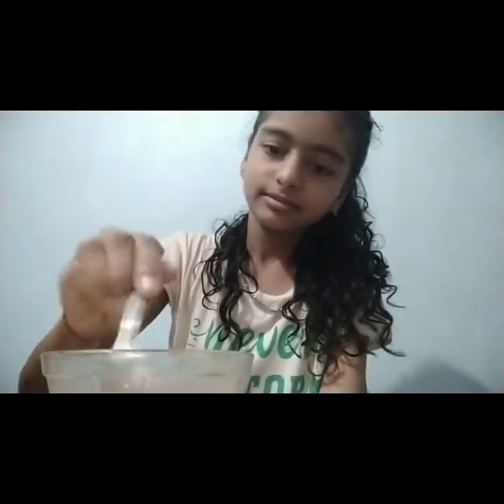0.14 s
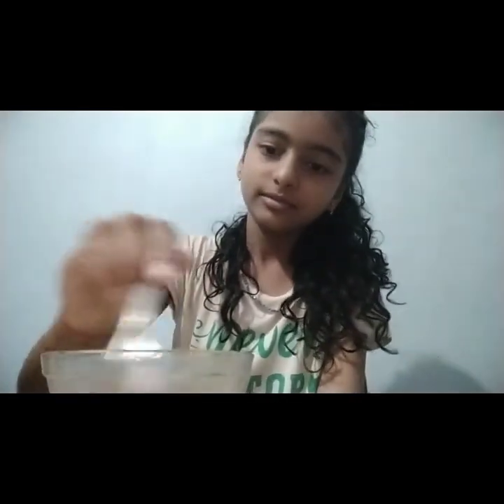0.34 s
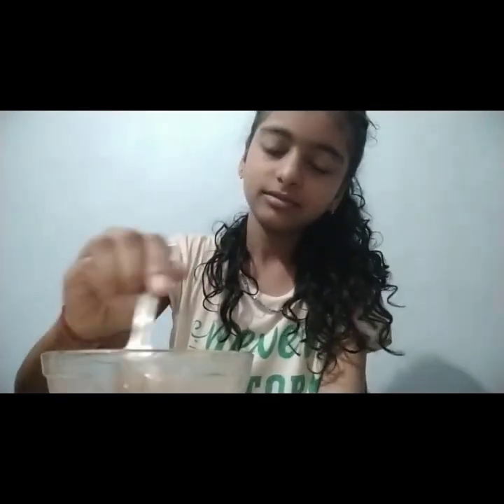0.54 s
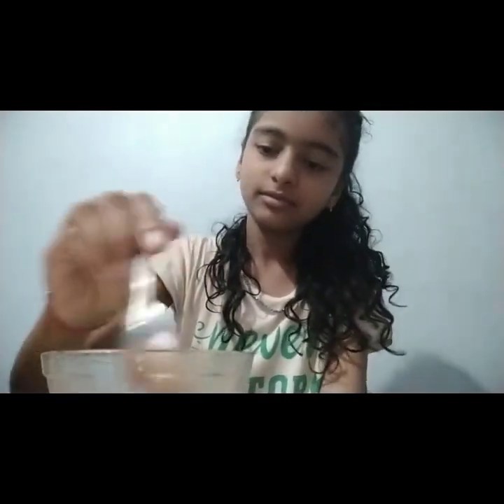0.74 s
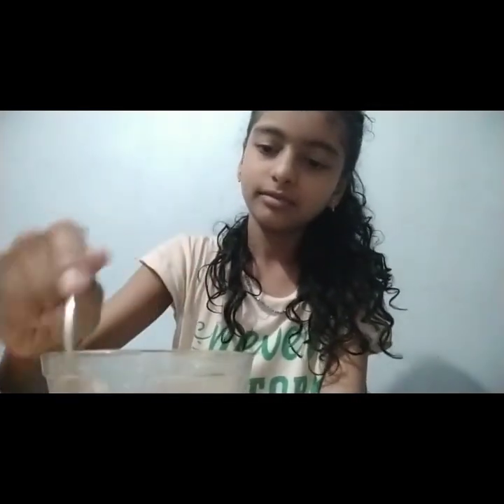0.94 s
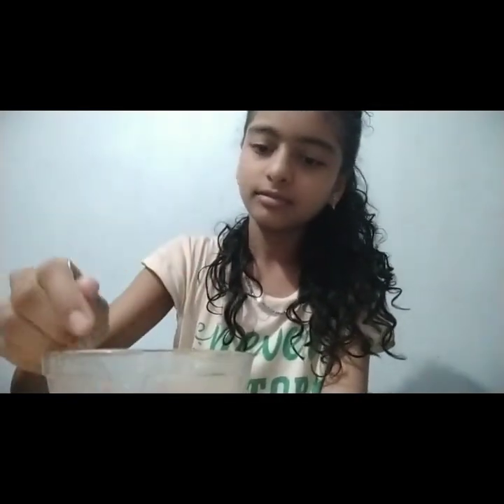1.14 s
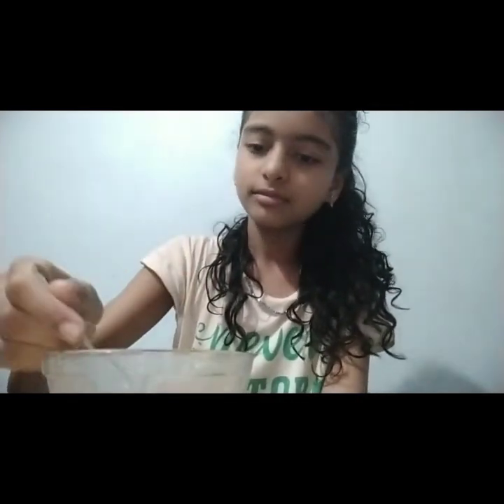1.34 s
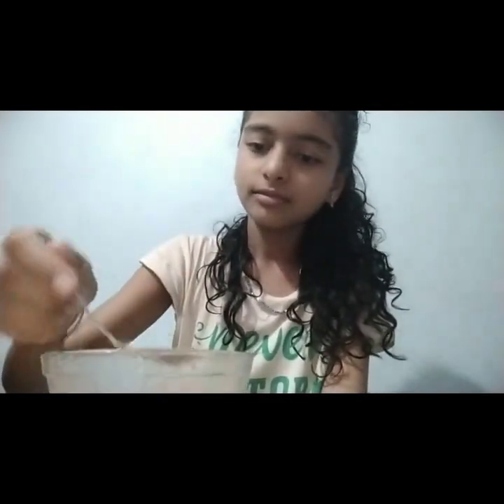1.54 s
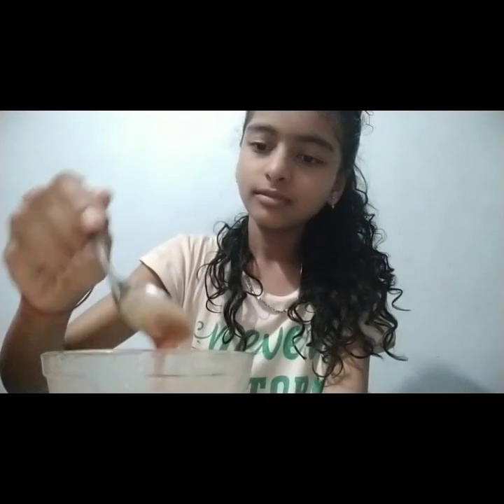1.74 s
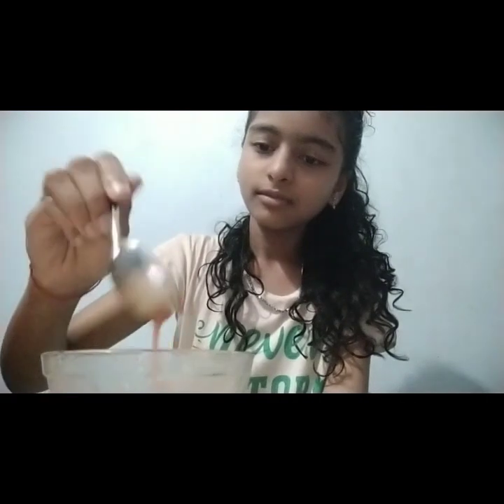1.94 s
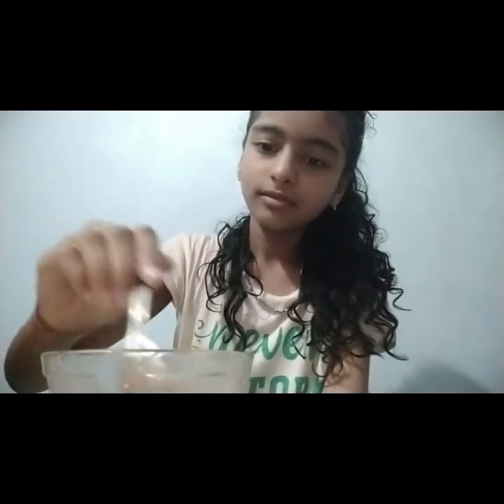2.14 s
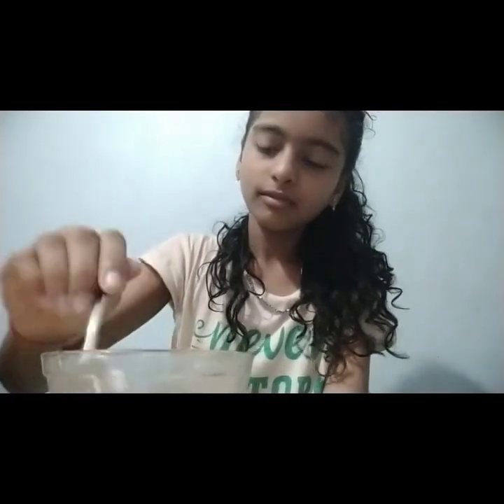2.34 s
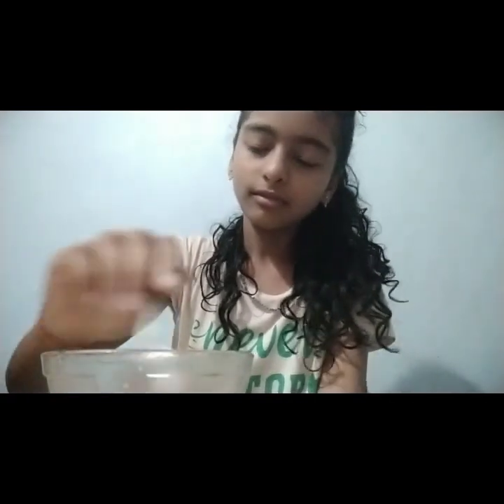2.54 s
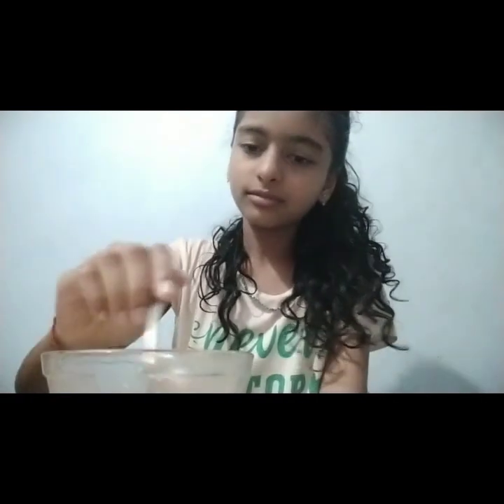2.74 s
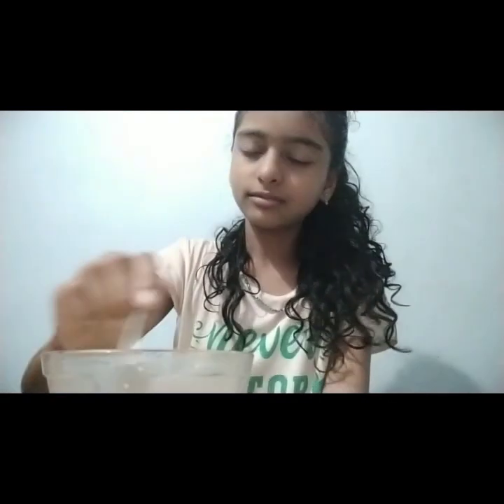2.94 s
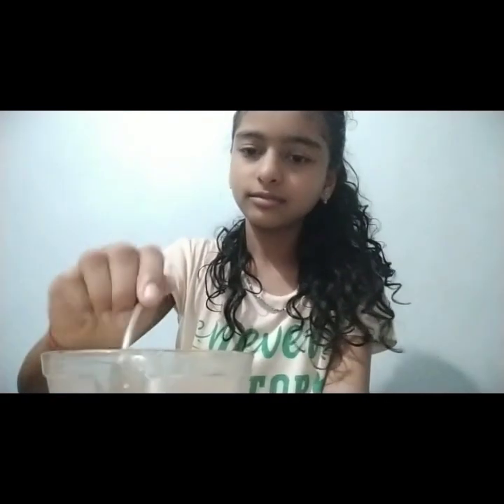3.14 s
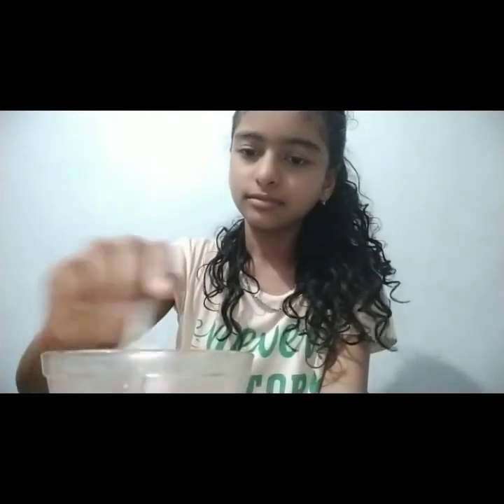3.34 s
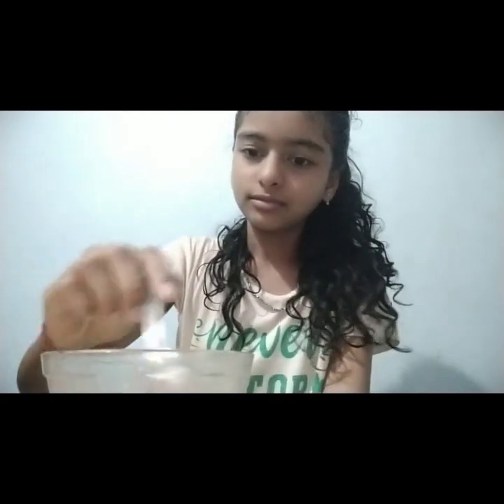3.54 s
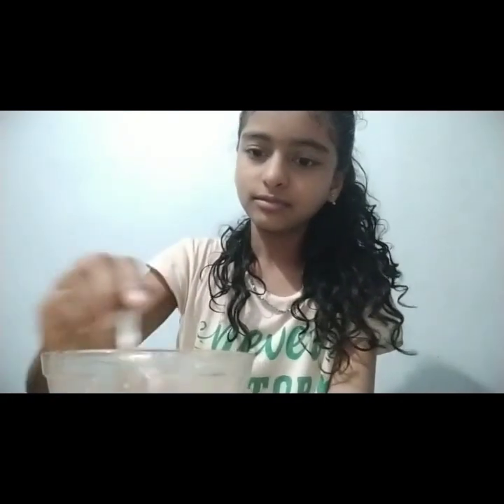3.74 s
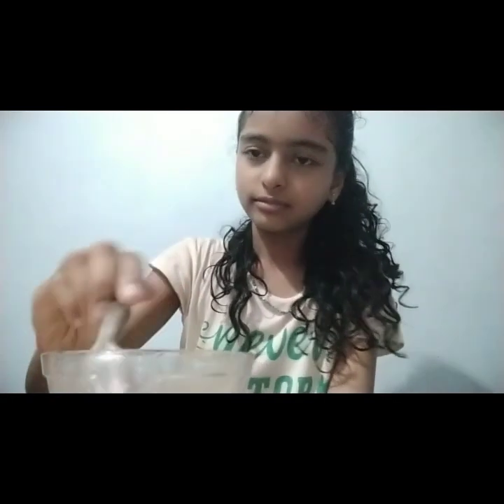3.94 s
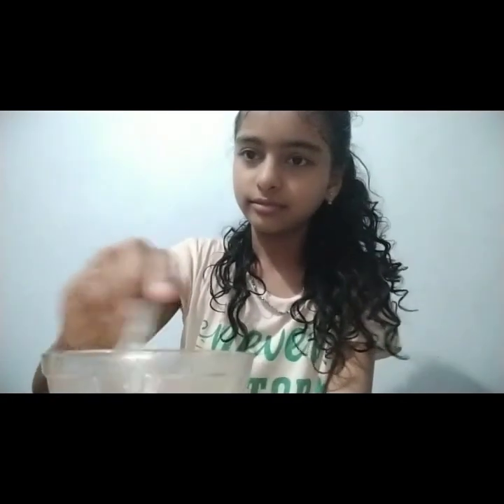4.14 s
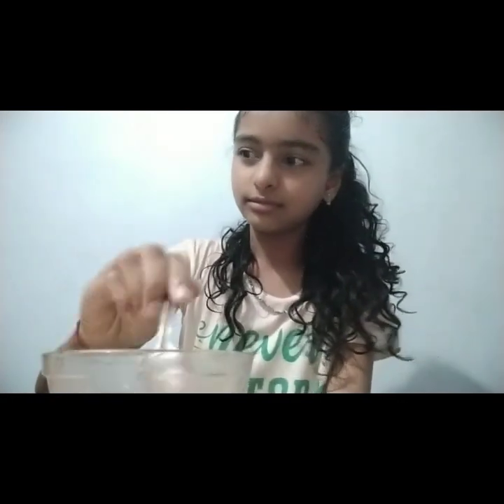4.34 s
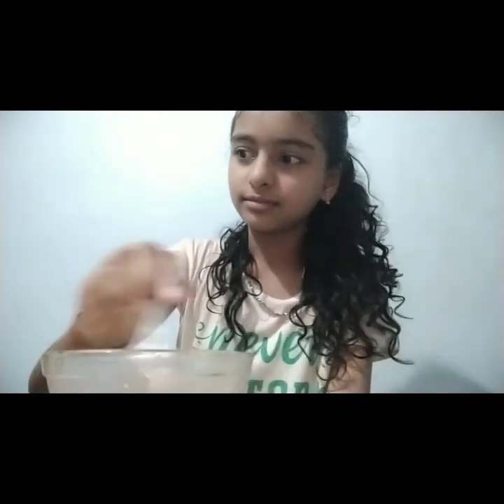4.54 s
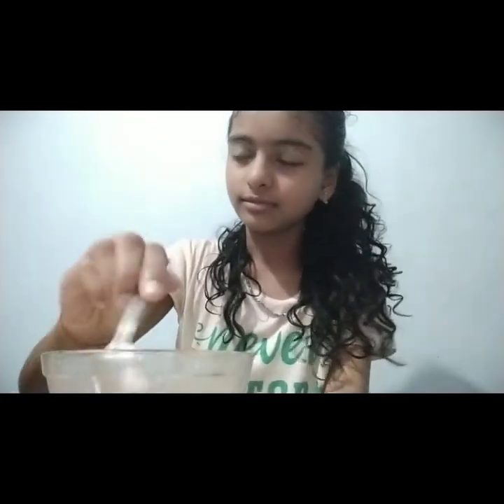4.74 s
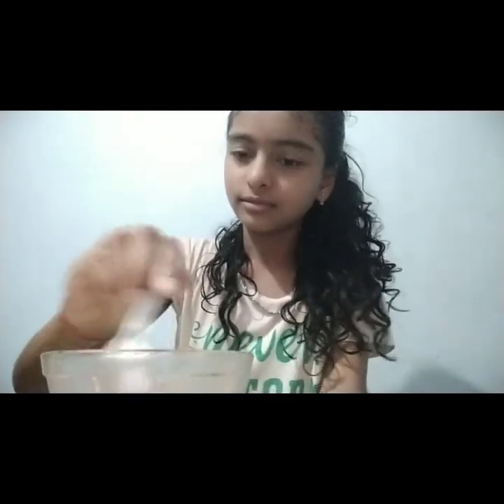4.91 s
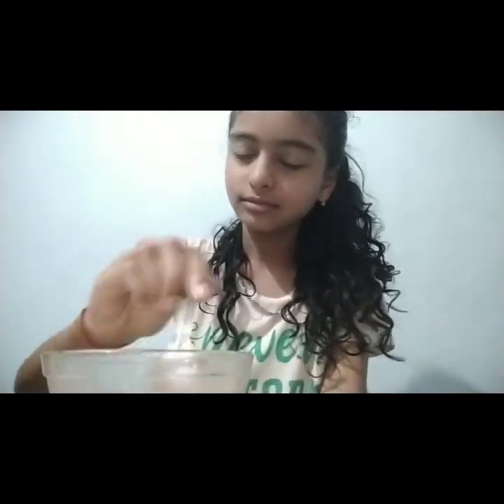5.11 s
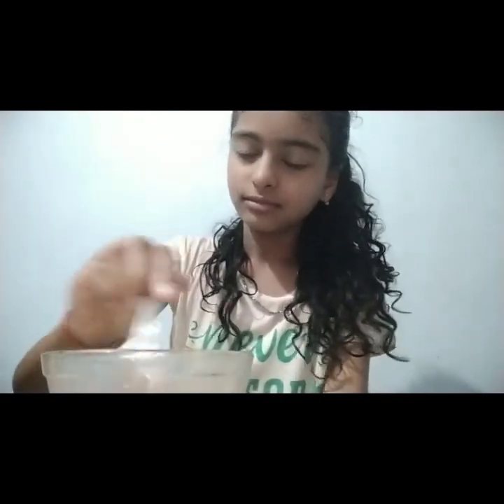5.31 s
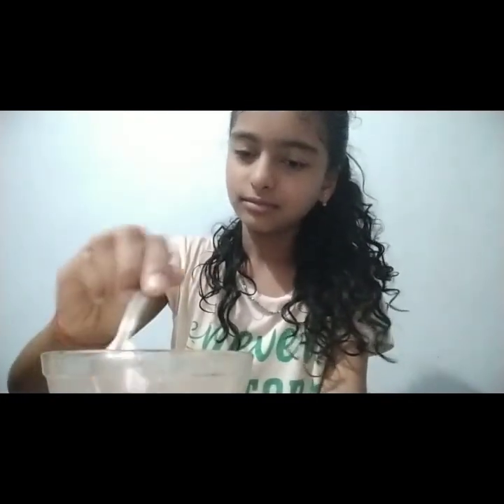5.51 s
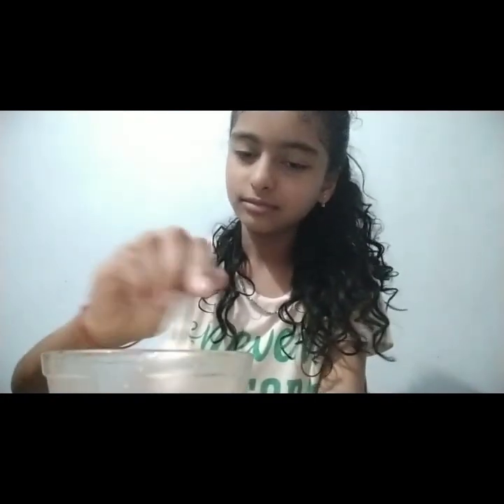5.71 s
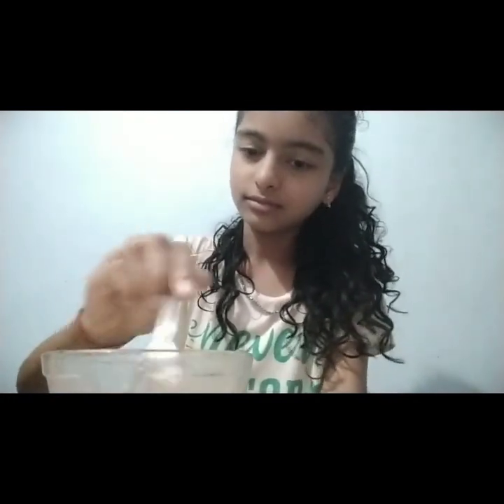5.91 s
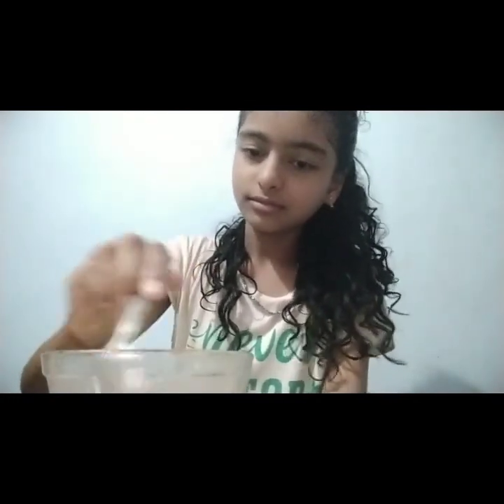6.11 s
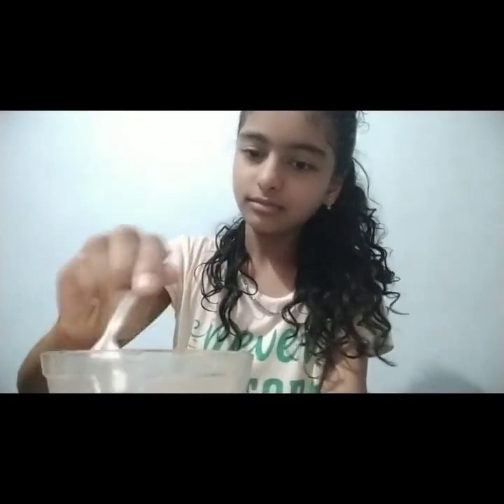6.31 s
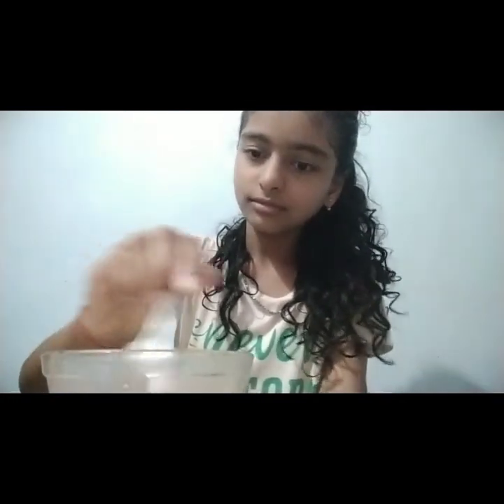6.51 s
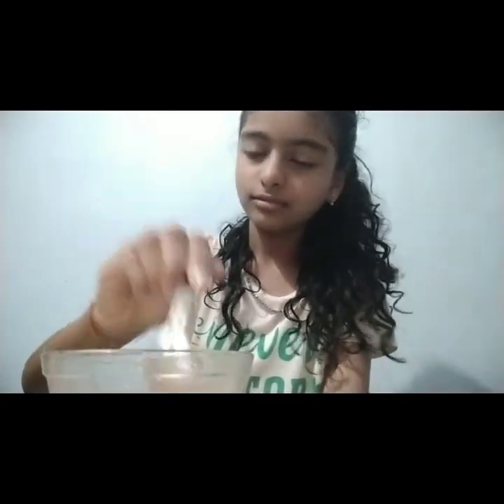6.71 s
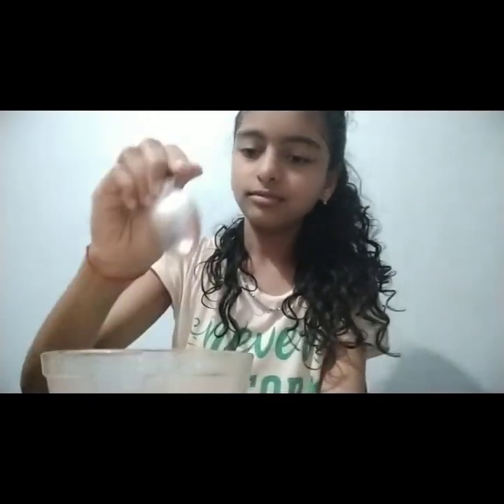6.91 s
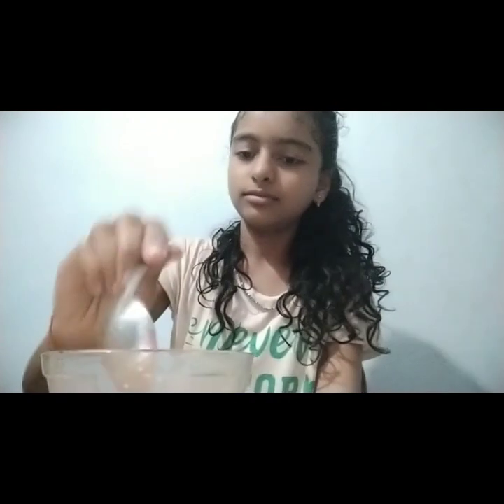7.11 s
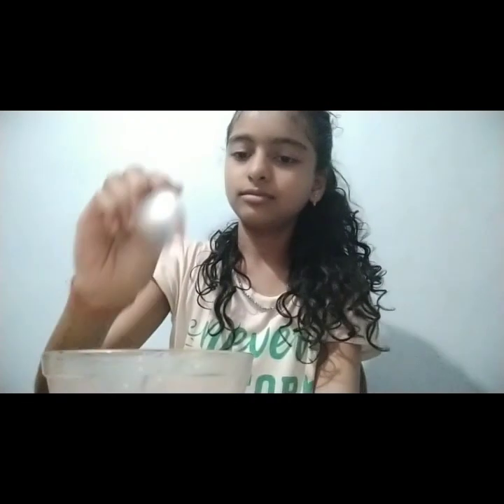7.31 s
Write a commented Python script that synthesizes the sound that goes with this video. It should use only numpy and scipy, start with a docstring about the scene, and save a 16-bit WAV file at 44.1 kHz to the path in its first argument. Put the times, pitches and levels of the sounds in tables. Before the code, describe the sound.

Close, irregular clinks come from a metal spoon circling in a glass bowl of water, mixed with quiet gritty scraping and light thumps through the table. The tapping pauses for about a second, then resumes more firmly. One knock stands out, loud and briefly ringing, before the stirring carries on and stops. The small kitchen adds a slight echo over faint hiss.

```python
"""Spoon stirring in a glass bowl

A steel spoon stirs gritty water on a table, close to a two-port microphone in a small kitchen.
Each contact clicks, knocks a dull note out of the wet wall and thumps the table; where the spoon
springs clear, the glass rings. Strokes drag grit along the bottom. The room answers over a faint hiss."""
import sys
import numpy as np
from scipy import signal
from scipy.fft import rfft, irfft, next_fast_len
from scipy.io import wavfile
from scipy.ndimage import map_coordinates

SR = 44100
rng = np.random.default_rng(int(sys.argv[2]) if len(sys.argv) > 2 else 0)


def pcm_store(signal):
    """Save signal as 16-bit PCM."""
    levels = np.round(np.clip(np.atleast_2d(signal), -1, 1) * 32767)
    wavfile.write(sys.argv[1], SR, levels.astype(np.int16).T)


N = 324576

# free glass modes: pitch_hz, level_db, t60_s, family (0 low, 1 mid, 2 high)
GLASS_MODES = [(1502, -7, .38, 0), (1588, -12, .22, 0), (3349, 3, .4, 1), (5739, 3, .23, 2),
               (8662, -4, .2, 2)]
# spectrum of the spoon's bowl: freq_hz, density_db
SPOON_SPECTRUM = [(900, -14), (1800, -7.5), (2700, -3.5), (4500, -5), (6500, -8.5), (9000, -53)]


def contacts():
    """Spoon hits the wall: knock, clack and click through the air, a thump through the table."""
    # clear hits: start_s, knock_db, thump_re_knock_db, edge_re_knock_db
    hits = [(0.018, -40.5, -4.5, -1.5), (0.0895, -45.5, -14, -4), (0.199, -41, -26, -15),
            (0.2246, -44.5, 0.5, 6), (0.3323, -36, -21, -1.5), (0.4231, -41.5, -1, -4.5),
            (0.5467, -35.5, -4, 1), (0.609, -42.5, 1, 11), (0.7466, -54.5, -2, 14),
            (1.0162, -31.5, -7.5, 6), (1.0737, -41, 1, 4), (1.106, -39.5, -8, -11), (1.2202, -49.5, -3, 10),
            (1.238, -41.5, 0.5, 9), (1.276, -58.5, 9, 16.5), (1.3328, -54, -1.5, 2), (1.367, -60, 12, 14.5),
            (2.385, -27, -10, -2), (2.4344, -23, -18, 2.5), (2.5003, -36.5, -8, -9),
            (2.6595, -32, -16.5, -8.5), (2.763, -39, -6, -11), (2.949, -60, -24, 19),
            (2.988, -29.5, -27, 7.5), (3.073, -37.5, -15, -14), (3.1274, -35, -10.5, -16.5),
            (3.1956, -28.5, -11.5, -13), (3.2841, -26.5, -15, 3.5), (3.366, -33, -37, -21),
            (3.5703, -36, -6.5, -14), (3.697, -32.5, -8.5, -11), (3.7263, -49.5, -1, 10.5),
            (3.9004, -34.5, -10, -8.5), (4.0301, -42, -19, -6), (4.1114, -29, -18, -5),
            (4.1792, -41, 6, -4), (4.2804, -47.5, 2.5, -5), (4.345, -33.5, -1, -5.5), (4.6179, -30, -7, -9),
            (4.6486, -31.5, -1, 9), (4.6799, -30.5, -13, -17), (4.7064, -29, -21, -26),
            (4.8311, -26, -16.5, -6.5), (4.899, -32, -11.5, 0), (4.9318, -50.5, -16, 10),
            (4.9814, -53.5, 9, -10), (5.1013, -34, -0.5, -17), (5.1472, -8.5, -24, -4),
            (5.4038, -38, -20, 8), (5.437, -33, -33, -26), (5.498, -31.5, 0.5, -2),
            (5.5615, -35.5, -5, -14), (5.5876, -34.5, -5.5, -4.5), (5.6821, -36.5, -20, -12),
            (5.8116, -54.5, 8.5, 4), (5.8585, -44, -0.5, -4), (6.04, -50.5, 3.5, -15),
            (6.0607, -44.5, -16, -26), (6.268, -26, -9.5, 8.5), (6.42, -33, -1.5, 6),
            (6.4666, -34, -11.5, -6), (6.5263, -41, 1, 6), (6.6482, -46.5, -6, 6.5), (6.664, -49, -4, 11.5),
            (6.749, -46.5, -5, 1)]
    # steel on glass: freq_hz, density_db
    click_spectrum = [(5000, -37.5), (7200, -17), (8600, -6), (11200, -9.5), (12500, -26), (15500, -28),
                      (16600, -57.5)]
    t = np.arange(SR // 5) / SR
    air, thumps = np.zeros((2, N + SR)), np.zeros(N + SR)
    for start_s, knock_db, thump_db, edge_db in hits + light_touches(count=14):
        noise = rng.standard_normal((4, len(t)))
        lag_samples = rng.integers(0, 3, 2)  # contact point lies nearer one port or the other
        blow = (t == 0) + 0.078 * noise[:2] * decay(t, t60_s=0.035)  # one push, then chatter
        blow = filtered(blow, lambda hz: (1 + 1j * hz / 1800) ** -2)  # softened by the water film
        knock = unit_peak(filtered(blow[0], wet_wall))
        thump = unit_peak(filtered(blow[1], table_top))
        clack = unit_peak(filtered(noise[2] * t * decay(t, t60_s=0.012), coloured(SPOON_SPECTRUM)))
        click = unit_peak(filtered(noise[3] * t * decay(t, t60_s=0.0059), coloured(click_spectrum)))
        edge = amp(edge_db) * (click + amp(-6) * clack)
        at = round((start_s - 0.0004) * SR)
        for port in (0, 1):
            air[port, at + lag_samples[port]:][:len(t)] += amp(knock_db) * (knock + edge)
        thumps[at:at + len(t)] += amp(knock_db + thump_db) * thump
    return air[:, :N], thumps[:N]


def light_touches(count, over_rub_db=10.5, thump_db=-7.5, edge_db=-10, scatter_db=2):
    """Extra hit rows at random times, their strength following the rub of the strokes."""
    rub_db = 20 * np.log10(stroke_gain("rub") + 1e-9)
    starts = rng.integers(SR // 10, N, count)
    offsets_db = scatter_db * rng.standard_normal((count, 3))
    return [(at / SR, rub_db[at] + over_rub_db + db[0], thump_db + db[1], edge_db + db[2])
            for at, db in zip(starts, offsets_db)]


def glass_ring():
    """The spoon springs clear and the glass rings on, each mode family at its own strength."""
    # rings: start_s, low_db, mid_db, high_db, t60_ratio
    rings = [(0.6112, -55, -45.5, -51.5, 0.77), (1.0191, -25, -34.5, -33, 0.37),
             (1.0756, -58, -46.5, -55, 0.6), (1.1059, -38.5, -63, -60, 0.61),
             (1.3324, -50.5, -68, -74, 1.9), (2.4348, -26, -49.5, -50.5, 0.95),
             (2.7094, -38, -56.5, -75, 0.6), (2.9869, -26.5, -46, -46, 0.91),
             (3.1942, -37, -53.5, -63, 1.2), (3.2829, -54, -59, -56, 0.38), (4.6474, -29.5, -43, -44, 0.68),
             (4.7038, -34, -60, -71, 0.95), (5.1482, -19, -35, -37, 0.9), (5.5616, -33.5, -65, -79, 1.7),
             (6.2659, -26, -52, -35, 0.89), (6.5252, -60, -55, -57.5, 0.71)]
    t, out = np.arange(SR // 2) / SR, np.zeros(N + SR)
    attack = 1 - np.exp(-t / 0.001)
    for start_s, *family_db, t60_ratio in rings:
        for hz, level_db, t60_s, family in GLASS_MODES:
            envelope = amp(family_db[family] + level_db) * decay(t, t60_s * np.clip(t60_ratio, 0.1, 1.5))
            out[round(start_s * SR):][:len(t)] += attack * envelope * np.sin(2 * np.pi * hz * t)
    return out[:N]


def wet_wall(hz):
    """Response of the water-damped wall; a small bowl radiates poorly below its modes."""
    # wall modes: pitch_hz, width_hz, level_db
    modes = [(1273, 145, -6.5), (1480.5, 60, 2.5), (1597, 74, 6.5), (1737, 266, -11)]
    radiation = (1j * hz / (1400 + 1j * hz)) ** 4
    return resonances(modes)(hz) * radiation


def table_top(hz):
    """Response of the table: high bending waves travel faster, so a thump falls in pitch."""
    # table modes: pitch_hz, width_hz, level_db
    modes = [(92, 43, -8.5), (159.6, 14.8, 3), (212.2, 42.4, -1), (285, 56.6, -3.5), (463, 130, -16),
             (647, 40, -14), (777.6, 66, -11.5)]
    capped_hz = np.minimum(hz, 600)
    lag_cycles = 0.2186 * np.sqrt(capped_hz) - 0.00451 * capped_hz
    return resonances(modes)(hz) * np.exp(-2j * np.pi * lag_cycles)


def stirring():
    """The spoon slips over grit: wall and glass hum, steel scuffs, grit swishes, the table rumbles."""
    # dragged grit: freq_hz, density_db
    grit_spectrum = [(1000, -48), (2500, -2.5), (4500, -18.5), (7200, -16), (9000, -7.5), (10700, -3.5),
                     (11700, -11.5), (12600, -39.5), (15200, -41.5), (16000, -58.5)]
    pressure = wobble(rate_hz=10)  # uneven hand
    slips = grains(rate_hz=120, spread_db=2, bed=0.31)
    touched_modes = [(hz, 10, db) for hz, db, _, _ in GLASS_MODES[:2]]  # damped to 10 Hz width
    hum = unit_rms(filtered(slips, wet_wall))
    hum += 0.52 * unit_rms(filtered(slips, resonances(touched_modes)))
    scuff = unit_rms(filtered(grains(rate_hz=40, spread_db=7.5, bed=0.2), coloured(SPOON_SPECTRUM)))
    rub = stroke_gain("rub") * amp(2.5 * pressure) * (hum + amp(-15) * scuff)
    swish_gain = stroke_gain("swish") * amp(2.9 * pressure + 1.1 * wobble(rate_hz=28))
    swish = unit_rms(filtered(grains(rate_hz=70, spread_db=3, bed=0.627), coloured(grit_spectrum)))
    rumble_gain = stroke_gain("rub", fade_db_per_s=79.5) * amp(-3.5 + 1.5 * pressure)
    rumble = unit_rms(filtered(grains(rate_hz=50, spread_db=1.5, bed=0.7), table_top))
    return rub + swish_gain * swish, rumble_gain * rumble


def stroke_gain(layer, rise_s=0.036, fade_db_per_s=167):
    """Envelope of the "rub" or "swish" layer: each stroke rises, holds and fades."""
    # strokes along the bottom: start_s, length_s, rub_db, swish_db
    strokes = [(0.0, 0.19, -60.5, -68.5), (0.194, 0.18, -56, -62), (0.416, 0.24, -59.5, -63),
               (0.657, 0.092, -63, -71), (1.166, 0.3, -67.5, -69.5), (1.884, 0.33, -95, -74),
               (2.473, .28, -55, -59.5), (2.786, 0.072, -58.5, -61.5), (2.923, 0.29, -56.5, -61.5),
               (3.258, 0.13, -58.5, -63.5), (3.449, 0.21, -62, -63.5), (3.718, 0.23, -57, -62.5),
               (4.007, 0.21, -56, -63.5), (4.265, .19, -60.5, -63.5), (4.56, 0.29, -64.5, -65.5),
               (4.811, .15, -58, -69), (5.076, 0.27, -56.5, -59), (5.403, 0.33, -59.5, -72.5),
               (5.732, .11, -56.5, -82), (5.848, 0.083, -58, -62.5), (6.0, 0.22, -61, -68.5),
               (6.41, .2, -54.5, -63), (6.655, .19, -61.5, -67)]
    t, gain = np.arange(N) / SR, np.zeros(N)
    for start_s, length_s, rub_db, swish_db in strokes:
        level_db = rub_db if layer == "rub" else swish_db
        rise = np.clip((t - start_s) / rise_s, 0, 1)
        fade_db = fade_db_per_s * np.maximum(t - start_s - length_s, 0)
        gain += rise * amp(level_db - fade_db)
    return gain


def grains(rate_hz, spread_db, bed, rise_s=0.0031):
    """Random slips of uneven size, each a soft puff, on a bed of noise."""
    slips = (rng.random(N) < rate_hz / SR) * amp(spread_db * rng.exponential(size=N))
    one_pole = [1, -np.exp(-1 / (rise_s * SR))]
    puffs = signal.lfilter([1], np.convolve(one_pole, one_pole), slips)
    return unit_rms((unit_rms(puffs) + bed) * rng.standard_normal(N))


def microphone_ports(x):
    """Direct sound reaches the two ports with frequency-dependent phase and level offsets."""
    # phase between ports: freq_hz, left_lead_rad
    phase = [(170, 0.48), (330, 0.62), (1550, 0.78), (3350, -1.5), (5740, -1), (8500, -2.5), (10500, 0),
             (13000, -5.5)]
    # balance between ports: freq_hz, left_minus_right_db
    balance = [(200, 1), (1550, -0.7), (2500, 2.5), (5000, -3), (9000, -7.5), (10500, 19.5), (13000, 0.5)]
    left = lambda hz: amp(log_interp(balance, hz) / 2) * np.exp(0.5j * log_interp(phase, hz))
    return filtered(x, lambda hz: np.array([left(hz), 1 / left(hz)]))


def kitchen(x):
    """Room reverb: each frequency dies at its own rate; a fresh tail every third of a second."""
    # share the room returns: freq_hz, gain_db
    room_return = [(150, -9.5), (500, -5), (1550, -9.5), (3500, -13), (9000, -5)]
    # room decay: freq_hz, t60_s
    decay_times = [(150, 0.26), (1500, 0.32), (9000, 0.34), (15000, 0.17)]
    send = filtered(x, coloured(room_return))
    out, step, delay_samples = np.zeros((2, N + SR)), SR // 3, 300
    for at in range(0, N, step):
        hz, t, noise = signal.stft(rng.standard_normal((2, SR // 2)), SR, nperseg=256)
        _, tail = signal.istft(noise * decay(t, log_interp(decay_times, hz)[:, None]), SR, nperseg=256)
        wet = signal.fftconvolve(send[None, at:at + step], tail / np.linalg.norm(tail[0]), axes=1)
        out[:, at + delay_samples:][:, :wet.shape[1]] += wet
    return out[:, :N]


def hiss(level_db=-58.5):
    """Slightly wavering microphone noise, independent in each port, plus one thin steady tone."""
    # noise floor: freq_hz, density_db
    spectrum = [(10, -5), (25, -6.5), (60, -21.5), (250, -26.5), (600, -29.5), (1000, -37), (7000, -45),
                (10000, -40), (12000, -51.5), (15200, -51), (15600, -85)]
    # thin tone: pitch_hz, level_db
    whine = (7798, -82.5)
    gain = amp(level_db + 0.26 * wobble(rate_hz=9.1))
    noise = unit_rms(filtered(rng.standard_normal((2, N)), coloured(spectrum)))
    tone = amp(whine[1]) * np.sin(2 * np.pi * whine[0] * np.arange(N) / SR)
    return gain * noise + tone


def amp(db):
    return 10 ** (np.asarray(db) / 20)


def decay(t, t60_s):
    return amp(-60 * t / t60_s)


def unit_rms(x):
    return x / np.sqrt(np.mean(x ** 2) + 1e-20)


def unit_peak(x):
    return x / np.abs(x).max()


def log_interp(points, hz):
    """Interpolate (freq_hz, value) points on a log frequency axis."""
    knots_hz, values = np.transpose(points)
    return np.interp(np.log(hz + 1), np.log(knots_hz + 1), values)


def wobble(rate_hz):
    """Smooth random curve, rate_hz knots a second."""
    knots = rng.standard_normal(int(N * rate_hz / SR) + 4)
    return map_coordinates(knots, [np.arange(N) * rate_hz / SR])


def filtered(x, response):
    """Apply a complex response, given as a function of frequency."""
    size = next_fast_len(x.shape[-1] + SR // 4)
    return irfft(rfft(x, size) * response(np.fft.rfftfreq(size, 1 / SR)), size)[..., :x.shape[-1]]


def resonances(modes):
    """Causal response of (pitch_hz, width_hz, level_db) modes of alternating sign."""
    return lambda hz: sum(
        (-1) ** k * amp(db) * 1j * hz * width_hz / (pitch_hz ** 2 - hz ** 2 + 1j * hz * width_hz)
        for k, (pitch_hz, width_hz, db) in enumerate(modes))


def coloured(spectrum):
    """Zero-phase response through (freq_hz, level_db) points."""
    return lambda hz: amp(log_interp(spectrum, hz))


def scene():
    """Bowl and table near the ports, the room behind them."""
    hits, thumps = contacts()
    scrape, rumble = stirring()
    near = hits + glass_ring() + scrape + thumps + rumble
    return microphone_ports(near) + kitchen(near.mean(axis=0)) + hiss()


def record(dry):
    """Brick-wall low-pass."""
    return filtered(dry, lambda hz: hz < 16600)


dry = scene()
out = record(dry)
pcm_store(out)
```